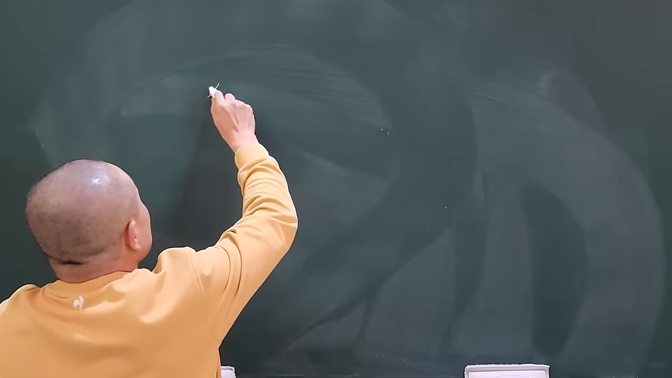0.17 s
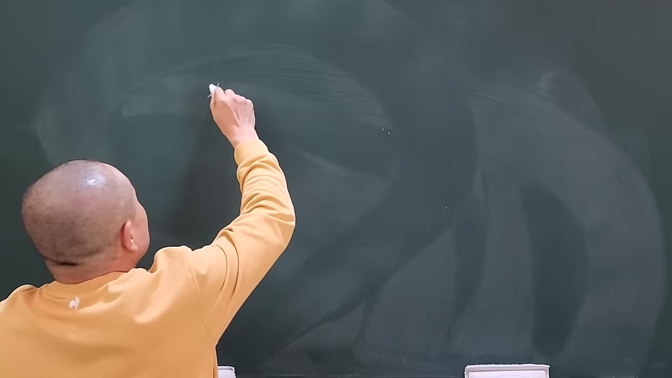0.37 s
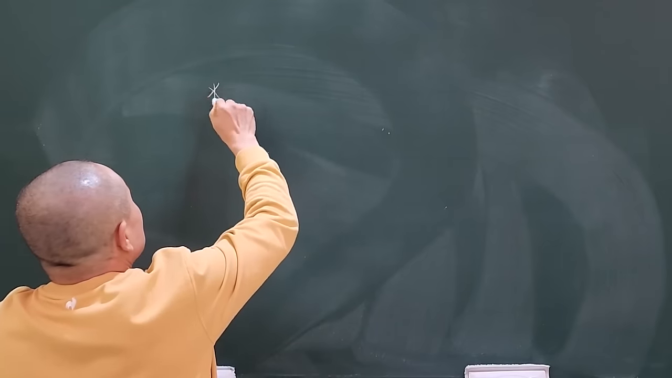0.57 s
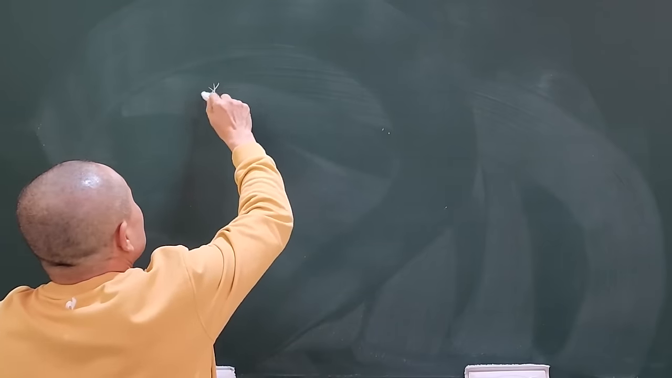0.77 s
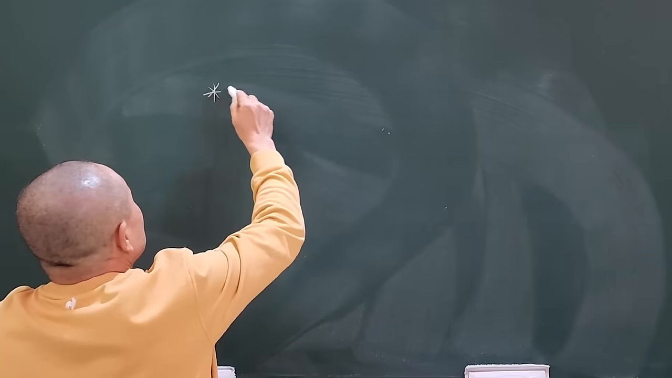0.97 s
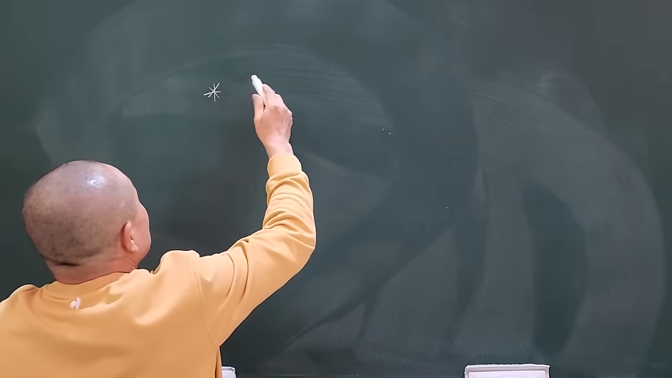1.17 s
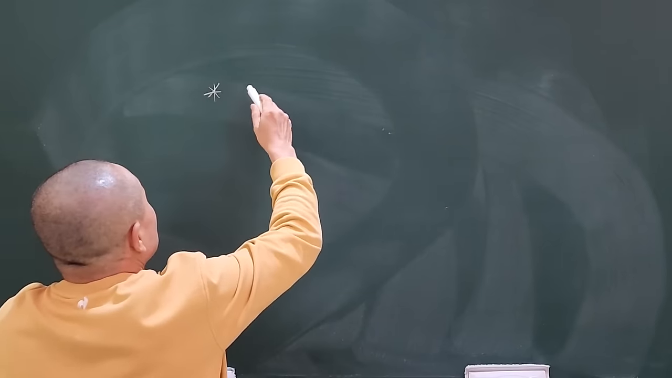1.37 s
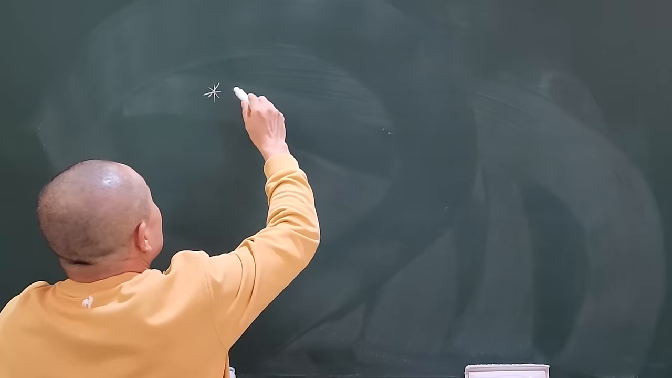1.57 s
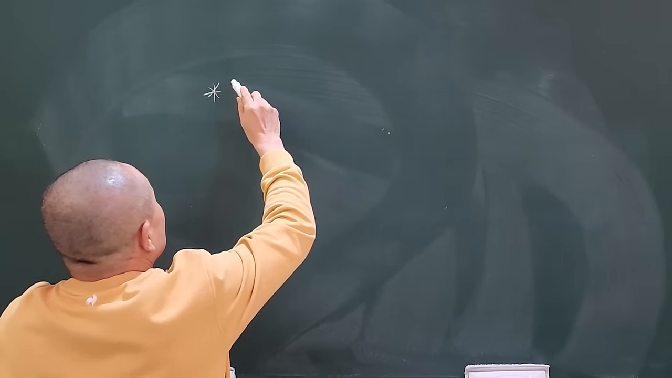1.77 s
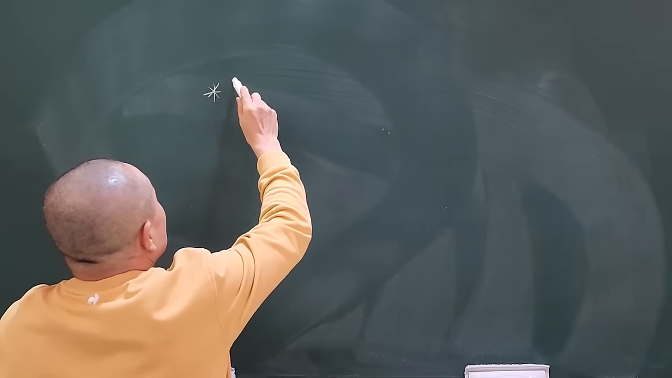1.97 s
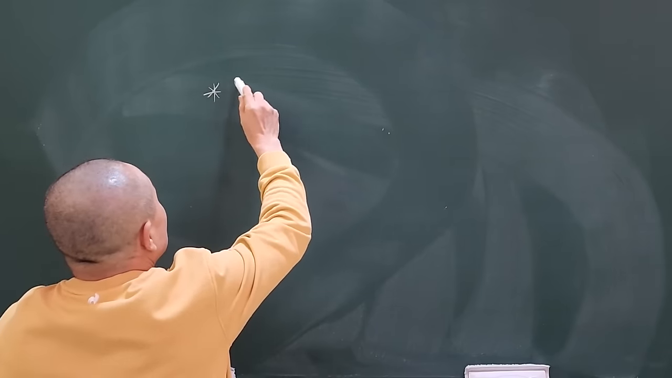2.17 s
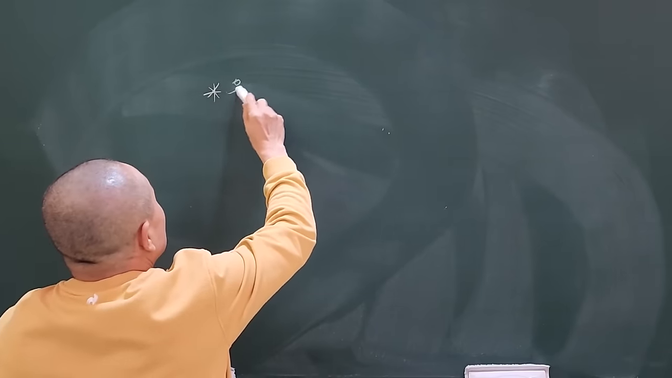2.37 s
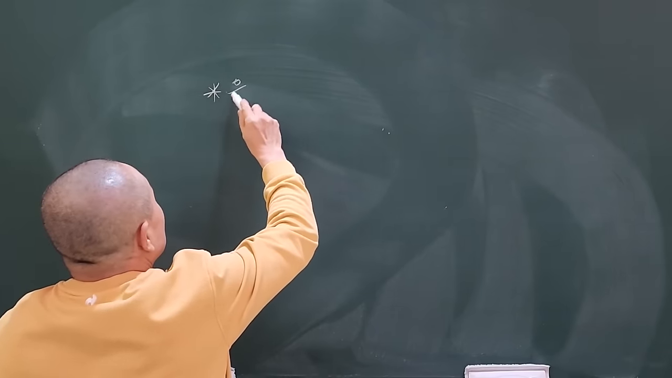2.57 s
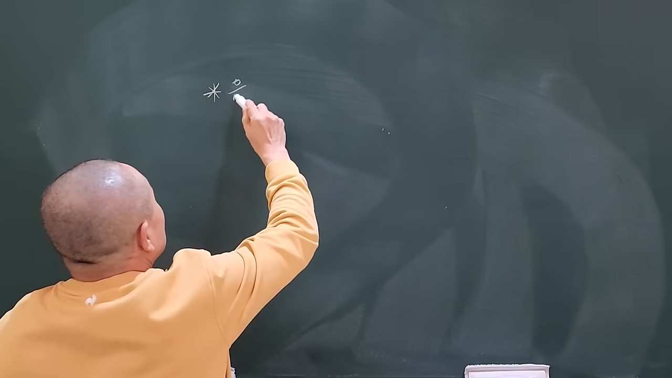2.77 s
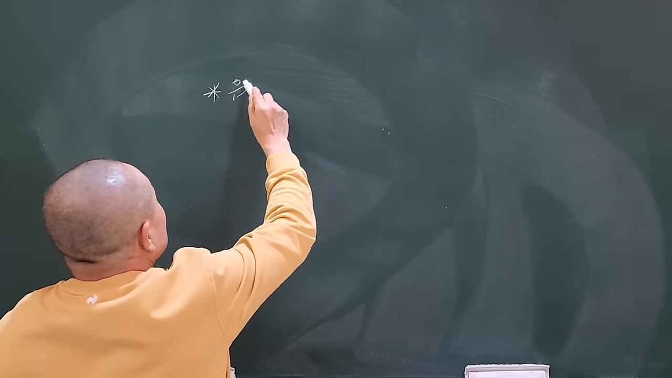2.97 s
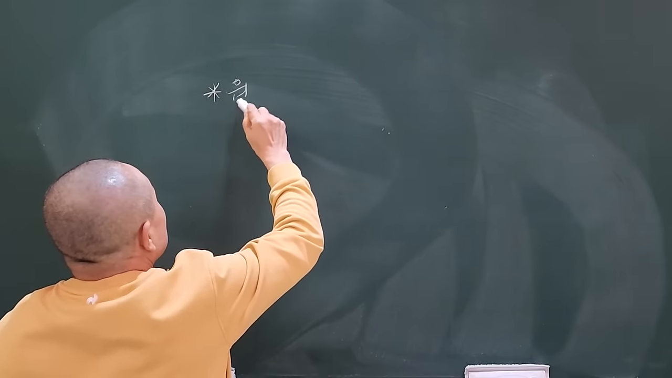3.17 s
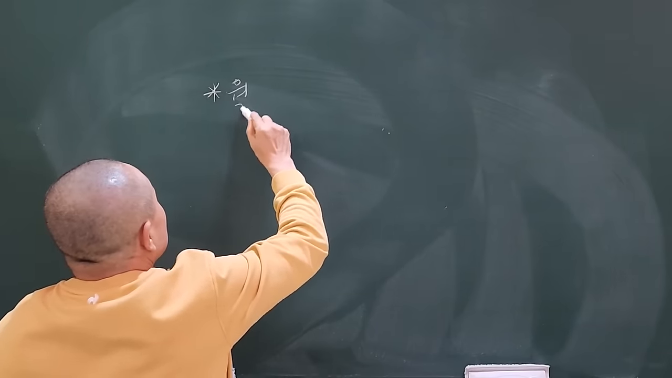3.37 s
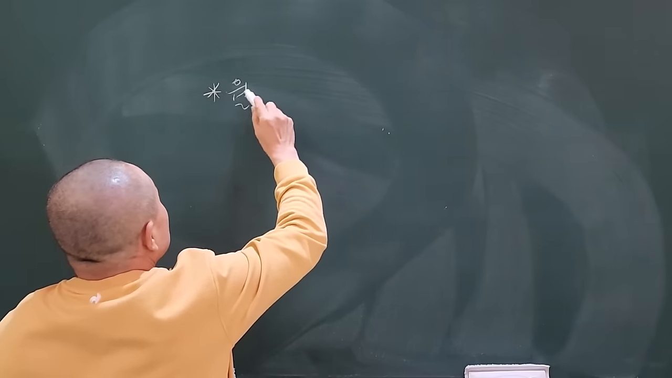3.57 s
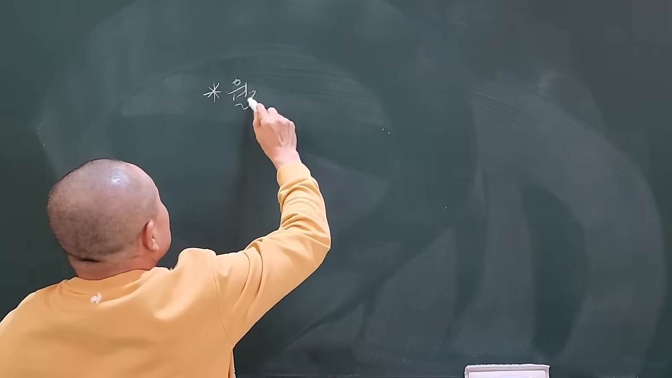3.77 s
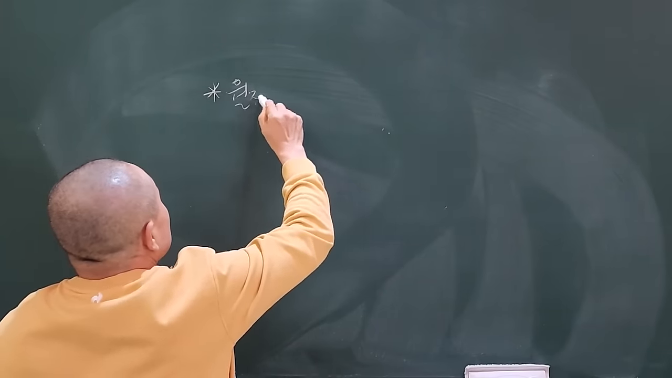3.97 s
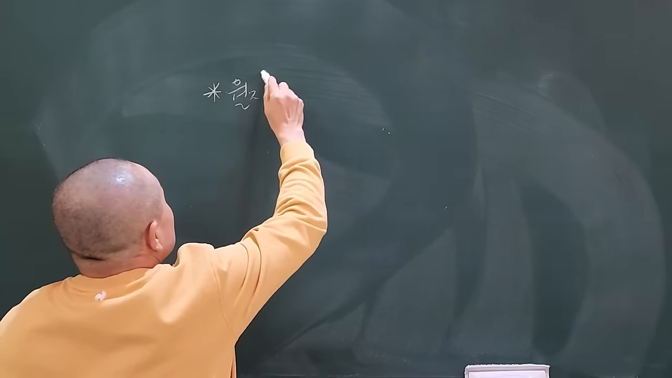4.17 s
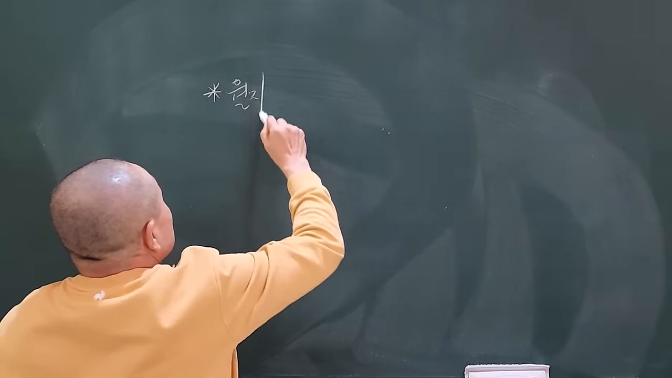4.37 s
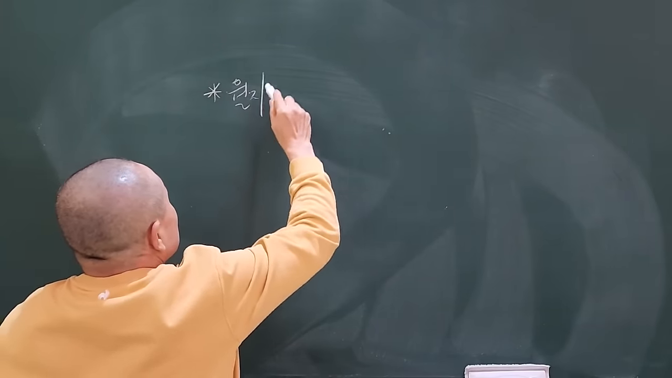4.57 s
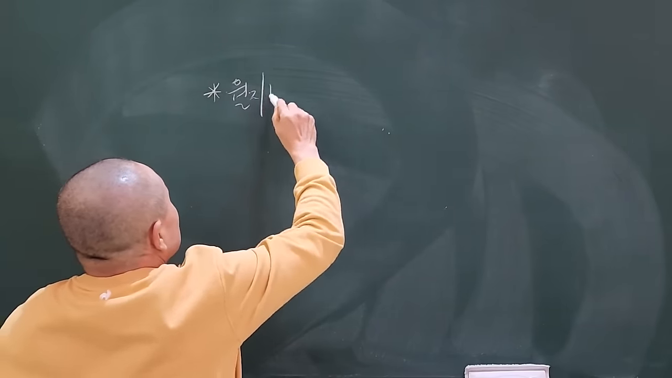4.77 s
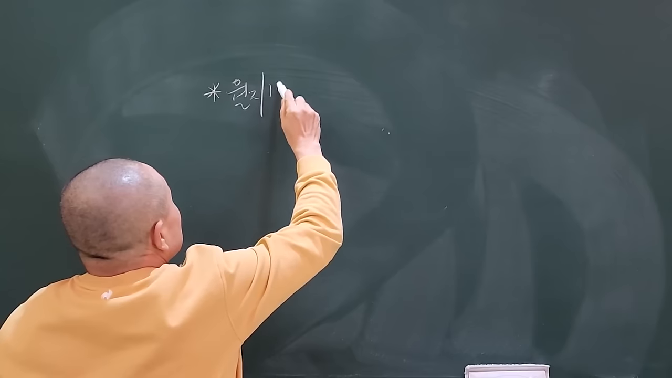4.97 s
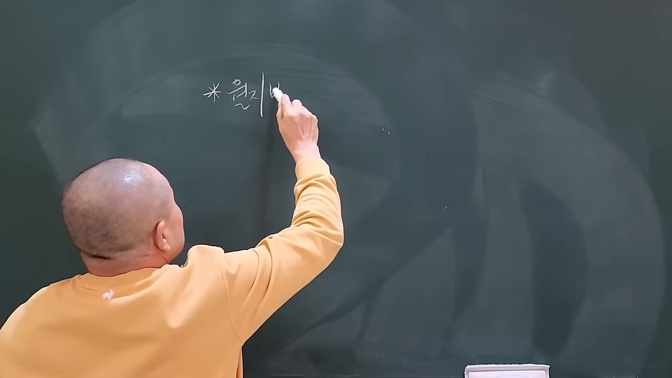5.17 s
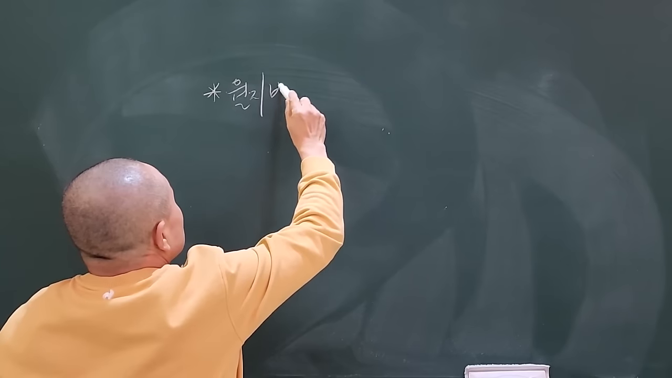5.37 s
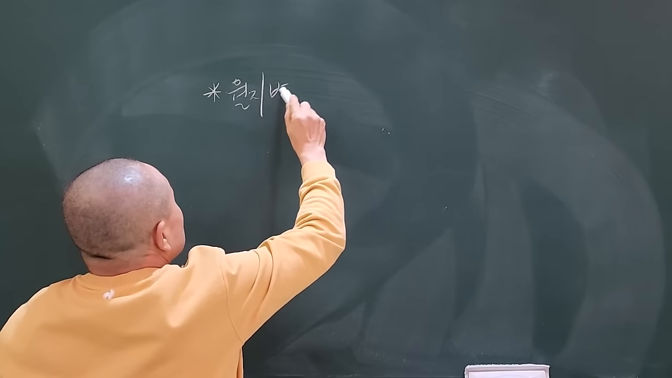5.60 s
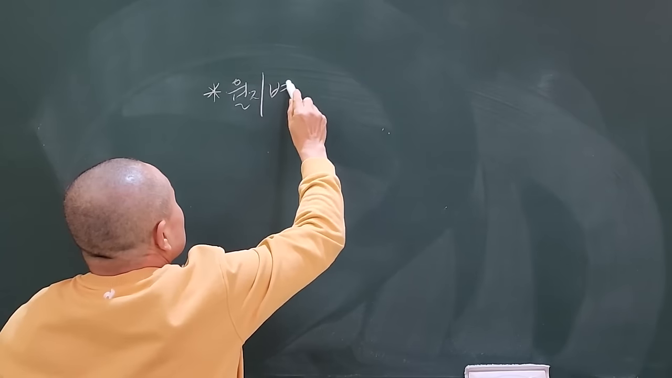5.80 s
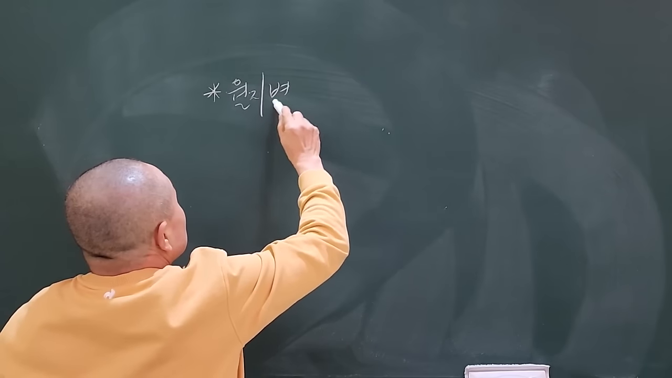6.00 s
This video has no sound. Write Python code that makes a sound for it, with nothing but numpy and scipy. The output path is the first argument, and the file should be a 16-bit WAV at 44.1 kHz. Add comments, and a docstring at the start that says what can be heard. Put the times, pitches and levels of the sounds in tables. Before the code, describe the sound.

A brief, shrill chalk scrape dies away, then chalk taps three times on a blackboard, each knock trailing into a short gritty hiss. In a pause of about a second, a sleeve brushes softly and a few dull bumps sound. The writing resumes with a steady, uneven run of taps and scratches that make the board ring slightly. It is heard from nearby in a quiet classroom with a faint low hum.

```python
"""Chalk taps and hisses across a blackboard as someone writes letters in a quiet classroom.
Each landing knocks the board into ringing; the tip then drags, and crumbs break off in a fine grit.
At the very start a hard, shrill scrape dies away.
Behind the writing sit a few soft bumps, one brush of a sleeve and the hum of the room."""
import sys
import numpy as np
from scipy import signal
from scipy.fft import rfft, irfft, next_fast_len
from scipy.io import wavfile

SR = 44100
rng = np.random.default_rng(int(sys.argv[2]) if len(sys.argv) > 2 else 0)


def pcm_store(signal):
    """Save signal as 16-bit PCM."""
    levels = np.round(np.clip(np.atleast_2d(signal), -1, 1) * 32767)
    wavfile.write(sys.argv[1], SR, levels.astype(np.int16).T)


N = 266231
TIME = np.arange(N) / SR
TOP_HZ = 15900

# the chalk lands and draws: (time [s], tap level [dB], hardness [dB], panel ring [dB],
# first push [dB], drag length [s], drag level [dB])
STROKES = [ (0.2205, 1, -1.5, -7.5, 3, 0.081, -53.5), (0.5241, 2, -3, -5, -1, .11, -53.5),
           (0.8188, 4.5, -7, -2, -1, .11, -50), (2.002, -4, -1, 1.5, 1, 0.094, -58),
           (2.3702, -8, 4, -2, 1, .12, -51.5), (2.6286, -2, 7.5, 0, -13, .11, -66),
           (2.8296, 0, -1, -1.5, 2, 0.14, -55), (3.3137, -2, 2, -1.5, -4, 0.12, -57.5),
           (3.6898, 2, 0.5, -2, -4.5, 0.19, -56.5), (4.229, -1, -7.5, 3, -1.5, .25, -50.5),
           (4.7191, 2.5, -0.5, 0.5, -2.5, 0.13, -55), (4.996, 2, -3.5, 0, -1, .15, -52.5),
           (5.428, 4, 4, 3.5, -6.5, .09, -62), (5.6168, -12, -8.5, -1.5, 4, 0.12, -58),
           (5.8178, -5.5, -9.5, 2, -1, 0.17, -53.5)]


def chalk_taps(panel_hz=319, panel_octaves=0.55):
    """Each tap is coloured by how hard the chalk lands and how well that spot feeds the panel's ring."""
    # a harder landing adds treble and a little thump: (frequency [Hz], boost [dB per dB of hardness])
    hardness_eq = [(100, 0.3), (320, 0), (1000, 0), (1700, 0.39), (2700, 0.67), (6200, 1), (12000, 1.1)]
    out, shared_tail = np.zeros(N), reverb(build_s=0.007)
    hz = np.geomspace(50, TOP_HZ, 24)
    panel_band = np.exp(-(np.log2(hz / panel_hz) / panel_octaves) ** 2)
    for start, db, hardness, panel_db, push_db, _, _ in STROKES:
        tint_db = hardness * curve_at(hardness_eq, hz) + panel_db * panel_band
        tap = board_knock(shared_tail, push_db)
        add(out, start, amp(db) * causal_eq(tap, list(zip(hz, tint_db))))
    return out


def board_knock(shared_tail, push_db, chatter_db=-8, chatter_s=0.0014, spread_s=0.003425, shared=0.33):
    """One landing: a sharp push and a brief chatter of the tip, then board and room ring on."""
    # tone of the tip hitting the board: (frequency [Hz], level [dB])
    contact_eq = [(40, -25), (150, 6.5), (400, 10), (1000, 14), (1400, 8.5), (2080, -6.5), (2550, 3),
                  (3900, -12.5), (5500, -4), (7000, -8.5), (9000, -17.5), (12000, -20.5), (16000, -19)]
    # modes of the chalk and of the board: (frequency [Hz], level [dB], t60 [s])
    tip_modes = [(5780, -58, 0.013), (6280, -33.5, 0.0052), (8100, -47, 0.008)]
    board_modes = [(58.7, -50.5, 0.65), (98.65, -43.5, 0.667), (174.8, -46, 0.7), (308.8, -24.5, 0.11),
                   (360.1, -29, 0.16), (511.4, -45, 0.43), (571.6, -30, 0.087), (632.5, -61, 0.042),
                   (768, -58, 0.16), (948, -37.5, 0.086), (1243, -44.5, 0.045), (1690, -38.5, 0.026)]
    # reflections off the writer, the board's frame and the walls: (delay [s], level [dB])
    echoes = [(.0029, -20), (.0049, -13.5), (.0058, -31), (.047, -34), (.053, -24), (0.073, -33.5),
              (.076, -30), (.095, -30)]
    # tone of the diffuse ring of board and room: (frequency [Hz], level [dB])
    tail_eq = [(30, 13), (65, 22), (130, 13.5), (230, 7.5), (340, 17), (440, 6.5), (580, 13.5), (750, 7.5),
               (1100, 6), (1600, 2), (2000, -3), (2750, -2), (3800, -15), (5800, -10), (9000, -20),
               (16000, -31)]
    size = len(shared_tail)
    t = np.arange(size) / SR
    push = amp(push_db) * signal.unit_impulse(size)
    for delay, db in echoes:
        add(push, delay, amp([db]))
    chatter = rng.standard_normal(size) * t * np.exp(-t / chatter_s)
    force = push + amp(chatter_db) * chatter / np.linalg.norm(chatter)
    tip = signal.fftconvolve(force, ringing(tip_modes, t))[:size]
    # the panel springs back once the bending wave has spread
    panel = -ringing(board_modes, np.maximum(t - spread_s, 0))
    # the hand moves little, so part of the tail repeats from tap to tap
    tail = np.sqrt(shared) * shared_tail + np.sqrt(1 - shared) * reverb(build_s=0.0053)
    return causal_eq(force, contact_eq) + tip + panel + causal_eq(tail, tail_eq)


def ringing(modes, t, spot_db=0.43):
    """Decaying modes; each struck spot feeds them a little differently."""
    offsets_db = spot_db * rng.standard_normal(len(modes))
    return sum(amp(db + offset - 60 * t / t60) * np.sin(2 * np.pi * hz * t)
               for (hz, db, t60), offset in zip(modes, offsets_db))


def chalk_drags(settle_s=0.021, neutral_db=-54.5, brightening=0.2, trim_db=-2, flicker_db=1.5):
    """Gritty hiss swells and fades with the hand's speed; quick strokes are louder and brighter."""
    # the hand turns a corner and draws on without a tap: (time [s], drag length [s], drag level [dB])
    turns = [(2.113, .08, -55.5), (2.24, .076, -52), (3.05, 0.2, -57.5), (3.443, 0.1, -57),
             (5.183, .14, -55)]
    # tone of the dragging chalk: (frequency [Hz], level [dB])
    grit_eq = [(200, -44), (900, 11), (2000, -3.5), (4200, -1), (5600, 9), (7200, 3.5), (8500, 6),
               (10000, 2), (12500, 5), (15500, 7)]
    # faint ring of the dragging stick: (frequency [Hz], width [Hz], level [dB])
    stick_peaks = [(5500, 660, 1), (8450, 700, 0.5), (14400, 1500, -1)]
    rasp_gain, fizz_gain = np.zeros((2, N))
    drags = [(landing + settle_s, length, db) for landing, *_, length, db in STROKES]
    for start, length, db in drags + list(turns):
        progress = np.clip((TIME - start) / length, 0, 1)
        speed = abs(np.sin(np.pi * progress ** 1.15)) ** 0.98  # fastest just past mid-stroke
        tilt_db = brightening * (db - neutral_db)
        rasp_gain += amp(db - tilt_db) * speed
        fizz_gain += amp(db + tilt_db) * speed
    grit = unit(shaped(crumbs(per_s=10000, spread_db=2), grit_eq, stick_peaks))
    rasp = signal.sosfiltfilt(signal.butter(4, 9500, fs=SR, output="sos"), grit)
    fizz = grit - rasp
    hiss = (rasp * rasp_gain + fizz * fizz_gain) * amp(trim_db + flicker_db * drift(hz=49.76))
    return with_room(hiss, wet_db=-4, build_s=0.012)


def crumbs(per_s, spread_db):
    """Chalk crumbs break off as random clicks, most small and a few large."""
    sizes = amp(spread_db * np.minimum(rng.exponential(1, N), 4))
    return unit(sizes * rng.standard_normal(N) * (rng.random(N) < per_s / SR))


def hard_scrape(start_db=-33.5, fade_db_per_s=72.5, fast_fade_s=0.17, fast_fade_db_per_s=220):
    """A shrill scrape, ringing in the stick's resonances, dies away steadily, then fades faster."""
    # broad tone of the scrape: (frequency [Hz], level [dB])
    scrape_eq = [(60, 1), (175, 15), (300, 7), (520, 13.5), (800, 5), (1500, -1.5), (3600, -4), (5400, 1.5),
                 (7500, -1.5), (10000, -4), (12500, -2), (16000, -5)]
    # resonances of the stick: (frequency [Hz], width [Hz], level [dB])
    stick_peaks = [(1980, 200, 9), (4720, 330, 7), (5330, 220, 11), (5980, 300, 6), (6750, 300, 3),
                   (8600, 460, 4), (10730, 340, 3.3), (11980, 230, 10.5), (12500, 350, 10), (13700, 330, 6),
                   (13400, 260, 4), (14300, 300, 7), (15200, 260, 6)]
    shrill = unit(shaped(crumbs(per_s=9700, spread_db=0.5), scrape_eq, stick_peaks))
    level_db = start_db - fade_db_per_s * TIME - fast_fade_db_per_s * np.maximum(TIME - fast_fade_s, 0)
    flicker_db = 0.1 * drift(hz=91)
    return shrill * amp(level_db - flicker_db)


def soft_bumps(rise_cycles=0.95):
    """Dull blows between the taps swell and die within a few cycles."""
    # one low or mid tone per bump: (time [s], level [dB], frequency [Hz])
    bumps = [(0.139, -39.5, 69.5), (1.055, -42, 88.5), (1.457, -54, 600), (1.503, -44, 650),
             (3.201, -57, 1090), (3.863, -36, 82)]
    out, t = np.zeros(N), np.arange(8192) / SR
    for start, db, hz in bumps:
        age = t * hz / rise_cycles
        add(out, start, amp(db) * age * np.exp(1 - age) * np.sin(2 * np.pi * hz * t))
    return with_room(out, wet_db=-9, build_s=0.0049)


def sleeve_rustle(start_s=1.03, peak_db=-65.5, rise_s=0.093, fade_db_per_s=45, flutter_db=3):
    """Cloth brushes once, softly, as the arm moves on to the next letter."""
    # tone of the cloth: (frequency [Hz], level [dB])
    cloth_eq = [(150, -9), (450, 2), (720, 8.5), (1100, -15), (2200, -29), (8000, -34)]
    age = TIME - start_s
    level_db = peak_db - fade_db_per_s * np.maximum(age - rise_s, 0) + flutter_db * drift(hz=25)
    cloth = unit(shaped(rng.standard_normal(N), cloth_eq))
    return cloth * amp(level_db) * np.clip(age / rise_s, 0, 1)


def room_tone(air_db=-52, waver=0.69, wander_rad=0.95):
    """A bed of low rumble and thin hiss under a wavering hum."""
    # tone of the quiet room: (frequency [Hz], relative level [dB])
    air_eq = [(20, -19), (35, -21), (55, -3), (72, -5), (100, -0.5), (135, -17.5), (170, -8), (210, -22.5),
              (300, -25), (450, -35), (1000, -37), (2200, -39.5), (3500, -32.5), (6000, -34.5), (9000, -37),
              (16000, -37)]
    # partials of the hum: (frequency [Hz], level [dB])
    hum_partials = [(58.4, -58), (97, -59.5), (171, -64.5)]
    bed = amp(air_db) * unit(shaped(rng.standard_normal(N), air_eq))
    for hz, db in hum_partials:
        gain = amp(db) * np.sqrt(2) * (1 + waver * drift(hz=1.4))
        bed += gain * np.sin(2 * np.pi * hz * TIME + wander_rad * drift(hz=4.2))
    return bed


def reverb(build_s, size=32768):
    """Dense reflections build up, then each band dies at its own rate."""
    # decay of the diffuse ring: (frequency [Hz], t60 [s])
    decay_times = [(60, 0.8), (300, 0.49), (1000, 0.45), (2700, 0.42), (6000, 0.28), (14000, 0.55)]
    hz, t, bands = signal.stft(rng.standard_normal(size), SR, nperseg=256)
    t60 = np.maximum(curve_at(decay_times, hz), 0.02)[:, None]
    equal_energy = np.sqrt(np.log(10 ** 6) / (t60 * SR))
    tail = signal.istft(bands * amp(-60 * t / t60) * equal_energy, SR, nperseg=256)[1][:size]
    return tail * (1 - np.exp(-(np.arange(size) / SR / build_s) ** 2))


def with_room(x, wet_db, build_s):
    """The direct sound plus the classroom's reverb."""
    return x + amp(wet_db) * signal.fftconvolve(x, reverb(build_s))[:N]


def causal_eq(x, curve, size=4096):
    """Minimum-phase EQ: nothing rings ahead of the hit."""
    log_gain = np.log(amp(curve_at(curve, abs(np.fft.fftfreq(size, 1 / SR)))))
    impulse = np.fft.ifft(np.exp(np.conj(signal.hilbert(log_gain)))).real
    return signal.fftconvolve(x, impulse[:size // 2])[:len(x)]


def shaped(x, curve, peaks=()):
    """Gives a steady sound a broad EQ curve plus resonant peaks."""
    size = next_fast_len(N)
    hz = np.fft.rfftfreq(size, 1 / SR)
    resonance = sum(amp(db) ** 2 / (1 + (2 * (hz - f) / width) ** 2) ** 2 for f, width, db in peaks)
    power = amp(curve_at(curve, hz)) ** 2 + resonance
    return irfft(rfft(x, size) * np.sqrt(power), size)[:N]


def drift(hz):
    """Smooth random modulation of rms 1, rolling off around hz."""
    size = next_fast_len(N)
    lowpass = np.exp(-(np.fft.rfftfreq(size, 1 / SR) / hz) ** 2)
    return unit(irfft(rfft(rng.standard_normal(size)) * lowpass, size)[:N])


def curve_at(curve, hz):
    """Reads a curve along a log-frequency axis."""
    knots_hz, values = np.transpose(curve)
    return np.interp(np.log(hz + 1), np.log(knots_hz + 1), values)


def add(mix, start_s, sound):
    """Lays a sound into the mix."""
    part = mix[max(round(start_s * SR), 0):][:len(sound)]
    part += sound[:len(part)]


def amp(db):
    """Decibels to gain."""
    return 10 ** (np.asarray(db) / 20)


def unit(x):
    """Scales to an rms of 1."""
    return x / np.sqrt(np.mean(x ** 2) + 1e-20)


def scene():
    """The writing and its background, mixed in mono."""
    writing = chalk_taps() + chalk_drags() + hard_scrape()
    return (writing + soft_bumps() + sleeve_rustle() + room_tone())[None]


def record(dry):
    """Trims the deepest bass and the very top of the treble."""
    low_cut = signal.butter(3, 38, "high", fs=SR, output="sos")
    high_cut = signal.firwin(511, TOP_HZ, window=("kaiser", 9), fs=SR)
    return signal.oaconvolve(signal.sosfilt(low_cut, dry), high_cut[None], "same")


dry = scene()
out = record(dry)
pcm_store(out)
```